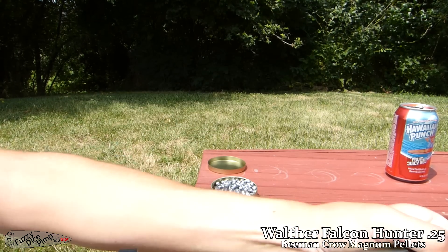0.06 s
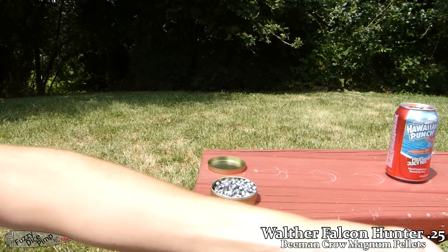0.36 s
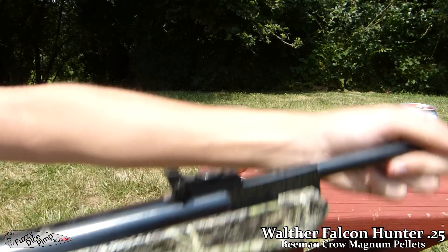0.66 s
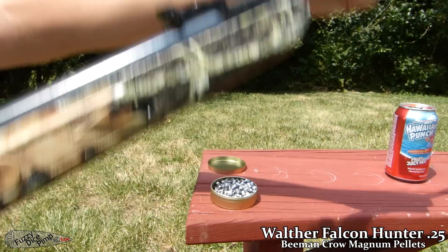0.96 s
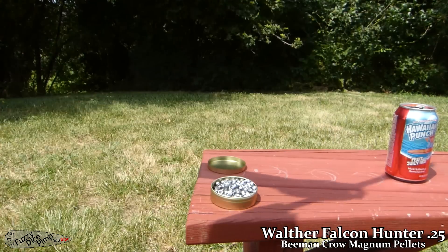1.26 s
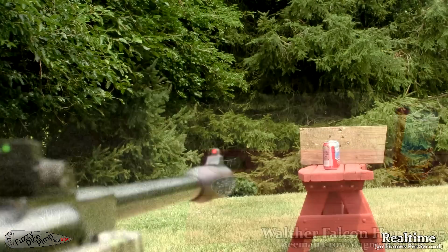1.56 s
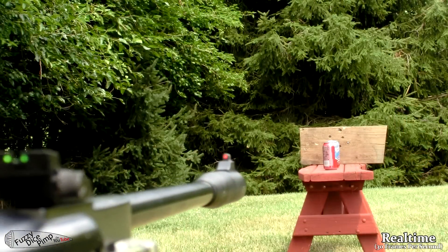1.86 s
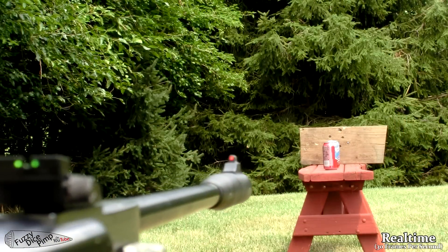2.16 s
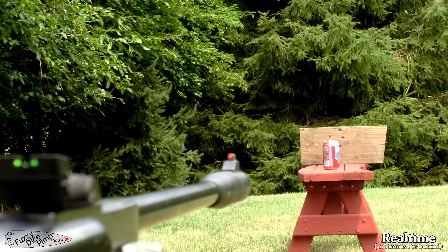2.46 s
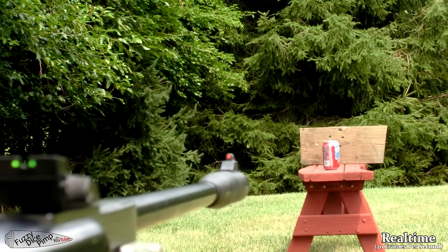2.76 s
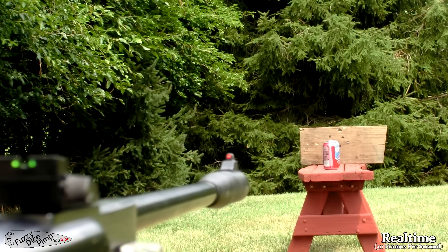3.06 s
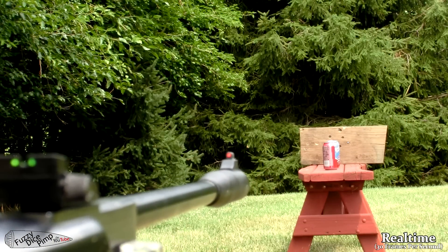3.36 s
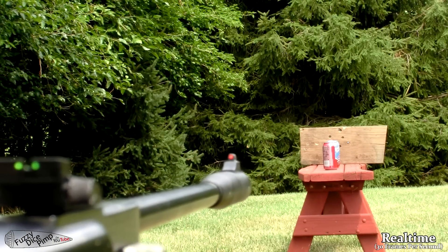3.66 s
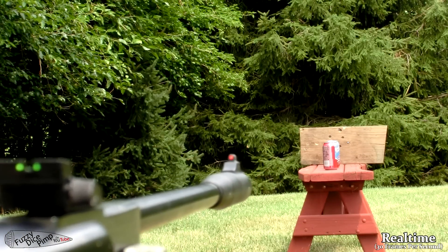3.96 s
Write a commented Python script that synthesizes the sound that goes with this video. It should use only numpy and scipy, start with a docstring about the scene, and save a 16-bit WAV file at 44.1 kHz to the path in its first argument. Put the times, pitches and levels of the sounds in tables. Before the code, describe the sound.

An air rifle clacks sharply right at the start, close and slightly left, its steel parts sliding, snapping and rattling for about 0.2 seconds. A small bird gives one high buzzy call at 0.3 seconds. Soft handling bumps come around 0.9 and 1.4 seconds, with light rustles until about 3. Distant birds chirp faintly over quiet leaf hiss, and a faint low rumble runs from 1.5 to 4 seconds.

```python
"""An air rifle clacks as it is handled on a lawn: steel parts slide, snap home in four quick blows and
rattle out, each blow ringing the action. A small bird gives one high buzzy call, a whistle swung fast in
pitch; others chirp far off in the trees. Leaves hiss, the gun is lifted with a soft rustle, and from
1.5 s on a low rumble lies under the garden air."""
import sys
import numpy as np
from scipy import signal
from scipy.fft import rfft, irfft, next_fast_len
from scipy.io import wavfile
from scipy.ndimage import uniform_filter1d, minimum_filter1d, map_coordinates

SR = 44100
rng = np.random.default_rng(int(sys.argv[2]) if len(sys.argv) > 2 else 0)


def bounce(signal):
    """Save signal as a 16-bit WAV file at the path given by the first command-line argument."""
    frames = np.transpose(np.atleast_2d(signal))
    limited = np.clip(frames, -1, 1)
    pcm = np.round(limited * 32767).astype(np.int16)
    wavfile.write(sys.argv[1], SR, pcm)


N = 176400


def amp(db):
    """Decibels to gain."""
    return 10 ** (np.asarray(db) / 20)


def unit(x):
    """Scale to rms 1."""
    return x / np.sqrt(np.mean(x ** 2) + 1e-20)


def along(points, hz):
    """Interpolate (Hz, value) points on a log axis."""
    f, v = np.transpose(points)
    return np.interp(np.log(hz + 1), np.log(f + 1), v)


def level(points):
    """Gain per sample from (s, dB) points."""
    return amp(np.interp(np.arange(N) / SR, *np.transpose(points)))


def pan(db):
    """Stereo gains, left over right by db."""
    g = amp(np.array([[db], [-db]]) / 2)
    return g / g.mean()


def filtered(x, response):
    """Filter x by response(Hz)."""
    n = x.shape[-1]
    m = next_fast_len(n + min(n, SR // 4))
    return irfft(rfft(x, m) * response(np.fft.rfftfreq(m, 1 / SR)), m)[..., :n]


def coloured(x, colour):
    """Filter x by (Hz, dB) points."""
    return filtered(x, lambda f: amp(along(colour, f)))


def resonate(x, peaks):
    """x through (Hz, width Hz, dB) resonances of alternating sign."""
    return filtered(x, lambda f: sum((-1) ** k * amp(db) * 1j * f * w / (c * c - f * f + 1j * f * w)
                                     for k, (c, w, db) in enumerate(peaks)))


def steady(x, size):
    """Even out the level over size samples."""
    return x / np.sqrt(np.abs(uniform_filter1d(x.mean(0) ** 2, size)) + 1e-20)


def near_noise(size, width=0.42):
    """White noise, mostly alike in both ears."""
    mid, side = rng.standard_normal((2, size))
    return np.array([mid + width * side, mid - width * side])


def diffuse_noise(colour):
    """Coloured stereo noise, mid at rms 1."""
    # Each row: frequency in Hz, left-right correlation.
    likeness = [(40, 0.92), (90, 0.95), (180, 0.8), (350, 0.33), (1000, 0.52), (4000, 0.6), (12000, 0.24)]

    def mid_side(hz):
        angle = np.arccos(np.clip(along(likeness, hz), -1, 1)) / 2
        return amp(along(colour, hz)) * [np.cos(angle), np.sin(angle)]
    mid, side = filtered(rng.standard_normal((2, N)), mid_side)
    return np.array([mid + side, mid - side]) / mid.std()


def wobble(rate_hz):
    """Smooth random curve, rate_hz knots a second."""
    knots = rng.standard_normal(int(N * rate_hz / SR) + 4)
    return map_coordinates(knots, [np.arange(N) * rate_hz / SR])


def add(out, start_s, x):
    """Mix x into out."""
    i = max(round(start_s * SR), 0)
    out[..., i:i + x.shape[-1]] += x[..., :max(N - i, 0)]


def echo(x, t60_s):
    """Diffuse stereo reverberation near unity gain."""
    t = np.arange(SR // 2) / SR
    tail = rng.standard_normal((2, len(t))) * amp(-60 * t / t60_s)
    return signal.fftconvolve(np.atleast_2d(x), tail / np.linalg.norm(tail[0]), axes=1)[:, :N]


def slide(steel_modes, slips_per_s=3000):
    """Tiny slips scrape the steel; the gun's hollow and stock sound with them."""
    # Envelopes. Each row: time in seconds, level in dB.
    scrape_level = [(0, -51), (.024, -43.5), (.051, -40.5), (.056, -38.5), (.072, -29), (.081, -32),
                    (.098, -29), (.104, -37.5), (.113, -48), (.121, -32), (.135, -27.5), (.146, -25.5),
                    (.158, -31.5), (.174, -33), (.19, -40), (.205, -48), (.215, -61), (.24, -92)]
    hollow_level = [(0, -57), (.011, -40.5), (.04, -44), (.06, -48.5), (.092, -33.5), (.112, -42.5),
                    (.13, -33), (.141, -28.5), (.162, -33), (.178, -29.5), (.19, -32.5), (.21, -57),
                    (.24, -93)]
    stock_level = [(0, -60), (.06, -62), (.09, -53), (.11, -51), (.128, -39), (.16, -41.5), (.2, -65),
                   (.24, -95)]
    # Spectra. Each row: frequency in Hz, gain in dB.
    scrape_colour = [(88, -49.5), (150, -20), (624, -14.5), (936, -1.5), (1270, -11.5), (1840, -3.5),
                     (2140, -11), (2860, -7), (3210, -18.5), (3970, -9.5), (4370, -17.5), (5950, -14),
                     (6430, -12), (8750, -22), (15000, -51.5)]
    stock_colour = [(120, -20), (260, -5), (500, -2), (700, -15), (1200, -43)]
    # Each row: centre in Hz, width in Hz, gain in dB.
    hollow_modes = [(766, 37, -10), (892, 26, -1), (955, 52, -2)]
    slips = near_noise(N) * (rng.random(N) < slips_per_s / SR) * amp(3 * rng.standard_normal(N))
    scrape = unit(coloured(slips, scrape_colour)) + amp(1) * unit(resonate(slips, steel_modes))
    hollow = level(hollow_level) * steady(resonate(near_noise(N), hollow_modes), size=600)
    stock = level(stock_level) * steady(coloured(near_noise(N), stock_colour), size=900)
    return level(scrape_level) * steady(scrape, size=400) + hollow + stock


def blows(steel_modes):
    """Each blow: a bright snap of steel contact, then a knock that rings the action."""
    # Each row: start in seconds, contact in seconds, snap in dB, snap cutoff in Hz,
    # knock delay in seconds, knock in dB, left over right in dB.
    impacts = [(0.0551, 0.0031, -27.5, 7000, 0.0006, -20.5, -1),
               (0.0643, 0.0078, -30.5, 7450, 0.0011, -24, 5), (0.0857, 0.0024, -15, 7500, 0.0018, -5, -2),
               (0.0918, 0.0023, -17.5, 10000, 0.00027, -25, 14),
               (0.0941, 0.0024, -14.5, 7100, 0.0008, -15, 0.5),
               (.1170, 0.0011, -5.5, 10400, 0.001, -25, -1.5),
               (0.1189, 0.0019, -13.5, 9600, .0003, -34, -2.5),
               (0.1257, 0.0017, -14, 6200, .001, -9.5, -0.5), (0.1392, .002, -29, 8500, .001, -27, 0),
               (0.1428, 0.0018, -27, 8500, .001, -29, 2), (.164, .002, -33.5, 8000, .001, -30, 0),
               (.1501, 0.0018, -27, 8500, .0008, -14, 3.5), (.1715, 0.0016, -31, 7500, .0008, -18.5, -4),
               (0.1836, 0.0012, -41, 6000, 0.00039, -26, -1), (0.1986, 0.0022, -46, 4000, 0.00043, -37, -1),
               (.2264, 0.0033, -48, 3500, 0.00079, -44, 0)]
    # Each row: frequency in Hz, gain in dB.
    snap_colour = [(300, -21), (900, -13), (2000, -13), (3100, -12.5), (3500, -4.5), (4350, -5.5),
                   (4900, 4), (5500, -0.5), (6400, -2.5), (8000, -3), (9500, -7.5), (11500, -23.5),
                   (15000, -27)]
    # Each row: frequency in Hz, level in dB, T60 in seconds.
    action_modes = [(506, -28.5, 0.036), (921, -18.5, 0.021), (1598, -16, 0.053), (1828, 1, 0.018),
                    (1840, -22.5, .1), (2070, -6, 0.012), (2584, -15, 0.035), (3386, -13.5, 0.012)]
    snap_rise_s, snap_fall_s, knock_rise_s = 0.00041, 0.00054, 0.00052
    out, t = np.zeros((2, N)), np.arange(SR // 16) / SR
    for start_s, contact_s, snap_db, top_hz, delay_s, knock_db, pan_db in impacts:
        envelope = np.minimum(t / snap_rise_s, 1) * np.exp(-np.maximum(t - contact_s, 0) / snap_fall_s)
        grit = filtered(near_noise(len(t)),
                        lambda f: amp(along(snap_colour, f)) / np.sqrt(1 + (f / top_hz) ** 8))
        snap = amp(snap_db) * envelope * steady(grit, size=60) * pan(pan_db)
        add(out, start_s, snap + amp(1) * resonate(snap, steel_modes))
        ring = np.zeros(len(t))
        for hz, db, t60_s in action_modes:
            decay = amp(db + rng.normal(0, 2.1) - 60 * t / t60_s)
            detuned_hz = hz * (1 + rng.normal(0, 0.0071))
            ring += decay * np.sin(2 * np.pi * detuned_hz * t + rng.normal(0, 0.83))
        knock = amp(knock_db) * ring * (1 - np.exp(-t / knock_rise_s))
        add(out, start_s + delay_s, knock * pan(pan_db))
    return out


def rifle(low_cut_hz=290):
    """The gun lies to the left and radiates little bass."""
    # Each row: centre in Hz, width in Hz, gain in dB.
    steel_modes = [(1650, 33, -9), (1822, 70, 3), (2620, 92, -0.5), (2900, 52, 1), (3490, 85, -6),
                   (4200, 76, -3), (4780, 59, -5), (5160, 39, 0.5), (5750, 56, -7), (6370, 140, -3),
                   (6670, 94, -3.5), (7320, 130, -7), (7900, 74, -11), (8720, 53, -7.5)]
    # Each row: frequency in Hz, left over right in dB.
    balance = [(150, -2.5), (450, 10), (900, 9), (1800, 7.5), (3000, 0), (5000, 1.5), (7500, 3),
               (10000, 8.5), (14000, 3)]

    def radiation(f):
        sides = amp(along(balance, f) * np.array([[1], [-1]]) / 2)
        return sides / sides.mean(0) * f ** 2 / np.hypot(f ** 2, low_cut_hz ** 2)
    return filtered(blows(steel_modes) + slide(steel_modes), radiation)


def garden():
    """Steady air, a passing breeze on the right, leaves, a thin high hiss and a low rumble."""
    # Spectra. Each row: frequency in Hz, gain in dB.
    air_colour = [(30, -31), (50, 0), (70, 8), (130, 8), (200, 5), (320, 0.5), (600, -1.5), (950, 1.5),
                  (1400, -6.5), (2000, -12.5), (3000, -20), (6000, -40), (15000, -42)]
    breeze_colour = [(50, -27), (130, 0.5), (260, 1.5), (500, -2.5), (950, 0.5), (1400, -5.5), (2200, -16),
                     (4000, -25), (10000, -45)]
    leaf_colour = [(1500, -15), (3200, -10), (4100, -4), (5000, -1.5), (6200, 0), (7200, -5.5), (9000, -7),
                   (11000, -18.5), (15000, -36)]
    hiss_colour = [(1500, -15.5), (3200, -11), (4200, -8.5), (5300, -5.5), (6000, 1.5), (6800, -3),
                   (8000, -11.5), (10000, -15.5), (15000, -23)]
    rumble_colour = [(15, -13), (35, -3.5), (55, 1), (75, -1.5), (110, -8.5), (180, -18.5), (400, -41)]
    # Envelopes. Each row: time in seconds, level in dB.
    breeze_level = [(0, -55), (.3, -55.5), (.9, -51.5), (1.4, -54), (1.65, -56), (1.9, -70), (4, -89.5)]
    leaf_level = [(0, -54.5), (.5, -56.5), (.75, -55.5), (1.4, -55.5), (1.6, -57.5), (1.8, -64), (2.7, -63),
                  (3.4, -70), (4, -83)]
    rumble_level = [(0, -85), (1.4, -77.5), (1.5, -54), (1.8, -51.5), (4, -51)]
    air = amp(-55 + 0.48 * wobble(9)) * diffuse_noise(air_colour)
    breeze = level(breeze_level) * amp(0.51 * wobble(11.76)) * diffuse_noise(breeze_colour) * pan(-9)
    leaves = level(leaf_level) * amp(0.54 * wobble(10)) * diffuse_noise(leaf_colour)
    hiss = amp(-62.5 + 0.29 * wobble(3.95)) * diffuse_noise(hiss_colour)
    rumble = level(rumble_level) * amp(1.1 * wobble(7)) * diffuse_noise(rumble_colour)
    return air + breeze + leaves + hiss + rumble


def near_bird(start_s=0.288, length_s=0.12):
    """A high whistle, swung rapidly in pitch, smeared by the trees."""
    pitch_hz, fall_hz, swing_hz, buzz_hz = 7200, 353, 670, 212
    t = np.arange(N) / SR - start_s
    progress = np.clip(t / length_s, 0, 1)
    buzz = np.cos(2 * np.pi * buzz_hz * t + 0.77 * wobble(300))
    hz = pitch_hz - fall_hz * progress + swing_hz * buzz
    envelope = np.minimum(progress / 0.094, 1) * np.sqrt(1 - progress)
    call = envelope * np.sin(2 * np.pi * np.cumsum(hz) / SR)
    return amp(-38.5) * pan(-2) * (call + amp(1) * echo(call, t60_s=0.47))


def far_birds():
    """Short gliding whistles, half lost in echo."""
    # Each row: start in seconds, length in seconds, first and last pitch in Hz, level in dB.
    chirps = [(0.592, 0.12, 2480, 2724, -60), (.55, 0.17, 2170, 2100, -65), (.97, .08, 4080, 3230, -59.5),
              (1.913, .025, 2790, 2560, -60), (2.311, 0.024, 2830, 2450, -58),
              (2.454, 0.049, 2750, 2750, -71), (2.645, 0.11, 2790, 2700, -71.5),
              (3.259, 0.058, 3080, 3030, -62.5), (3.362, 0.072, 2295, 2080, -67),
              (3.82, .11, 2520, 2220, -68), (3.95, .03, 3460, 3530, -63.5)]
    out = np.zeros(N)
    for start_s, length_s, start_hz, end_hz, db in chirps:
        progress = np.linspace(0, 1, int(length_s * SR))
        hz = start_hz + (end_hz - start_hz) * progress
        envelope = np.sqrt(np.abs(np.sin(np.pi * progress)))
        add(out, start_s, amp(db) * envelope * np.sin(2 * np.pi * np.cumsum(hz) / SR))
    return out + amp(1.5) * echo(out, t60_s=0.36)


def handling(rustle_octaves=0.29, bump_rise_s=0.003, tick_t60_s=0.012):
    """Soft rustles, bumps and ticks as the gun is handled."""
    # Each row: peak time in seconds, half length in seconds, centre in Hz, level in dB.
    rustles = [(0.744, .07, 4570, -53), (1.45, 0.047, 4700, -50.5), (1.557, .07, 4900, -60),
               (1.8, 0.067, 5000, -61), (2.098, .06, 5000, -60), (2.42, 0.073, 4900, -61.5),
               (2.693, 0.066, 4170, -61.5), (3.063, 0.096, 4830, -62)]
    # Each row: start in seconds, pitch in Hz, T60 in seconds, level in dB.
    bumps = [(.888, 255, 0.058, -33.5), (1.258, 250, 0.038, -43), (1.417, 980, .1, -39.5)]
    # Each row: start in seconds, level in dB.
    ticks = [(1.428, -59), (1.506, -55)]
    out = np.zeros((2, N))
    t = np.arange(SR // 2) / SR - 0.25
    for peak_s, half_s, hz, db in rustles:
        band = filtered(rng.standard_normal((2, len(t))),
                        lambda f: np.exp(-(np.log2((f + 1) / hz) / rustle_octaves) ** 2 / 2))
        add(out, peak_s + t[0], amp(db) * unit(band) * np.exp(-(t / half_s) ** 2 / 2))
    t = np.arange(SR // 4) / SR
    for start_s, hz, t60_s, db in bumps:
        envelope = amp(db - 60 * t / t60_s) * (1 - np.exp(-t / bump_rise_s))
        add(out, start_s, envelope * np.sin(2 * np.pi * hz * t))
    t = np.arange(SR // 50) / SR
    for start_s, db in ticks:
        add(out, start_s, amp(db - 60 * t / tick_t60_s) * rng.standard_normal((2, len(t))))
    return out


def scene():
    """The gun close by with a short yard echo, birds and garden around it."""
    gun = rifle()
    return gun + amp(-14) * echo(gun, t60_s=0.05) + near_bird() + far_birds() + handling() + garden()


def record(dry, ceiling=0.93, smooth_samples=40, top_hz=15600):
    """Peak limiter, then a brick-wall low-pass."""
    max_gain = np.minimum(1, ceiling / (np.abs(dry) + 1e-9))
    gain = uniform_filter1d(minimum_filter1d(max_gain, 2 * smooth_samples), smooth_samples)
    return filtered(dry * gain, lambda hz: hz < top_hz)


dry = scene()
out = record(dry)
bounce(out)
```